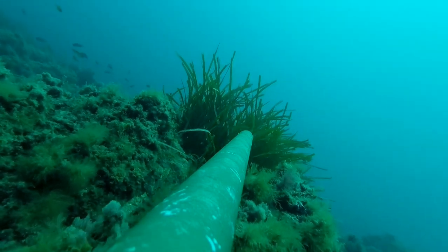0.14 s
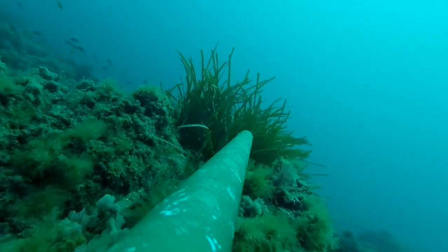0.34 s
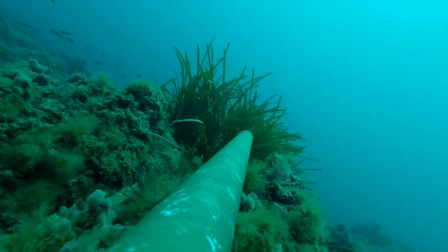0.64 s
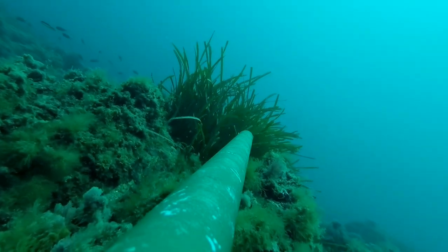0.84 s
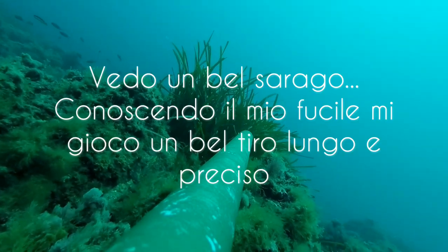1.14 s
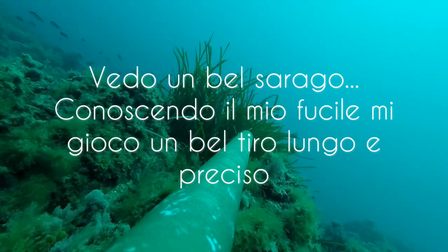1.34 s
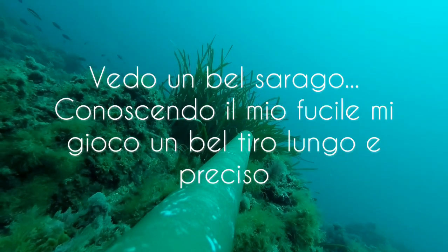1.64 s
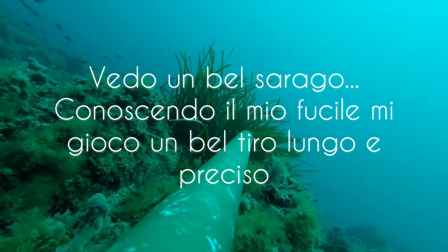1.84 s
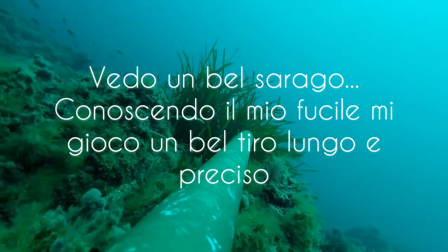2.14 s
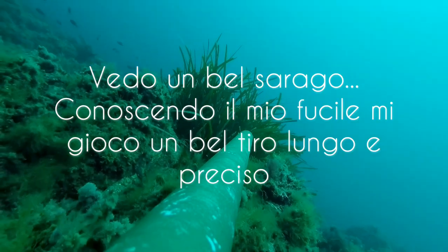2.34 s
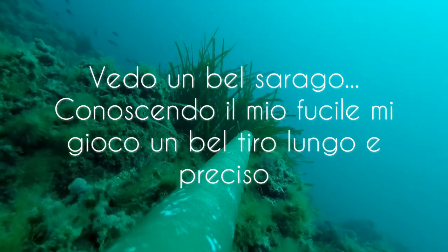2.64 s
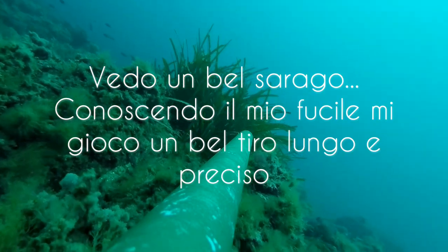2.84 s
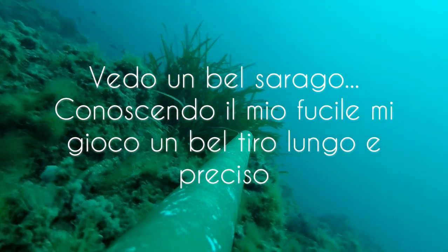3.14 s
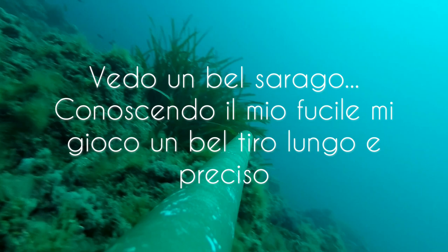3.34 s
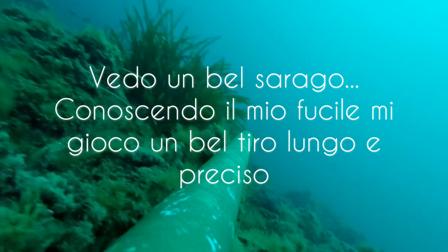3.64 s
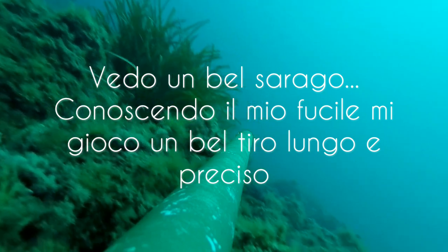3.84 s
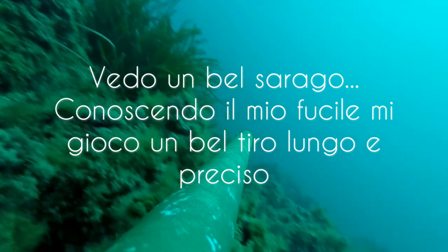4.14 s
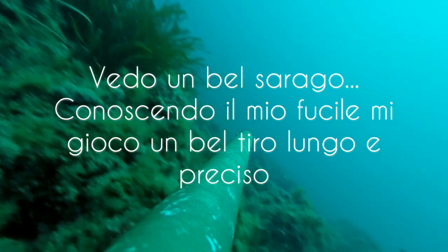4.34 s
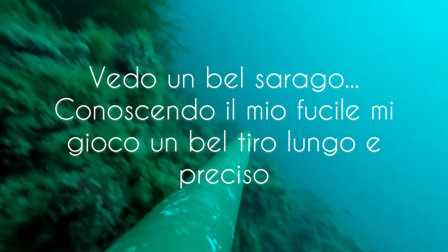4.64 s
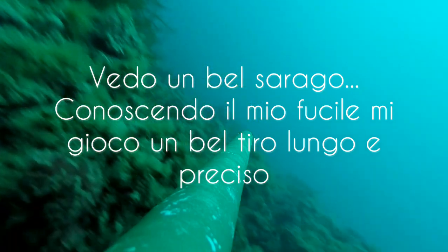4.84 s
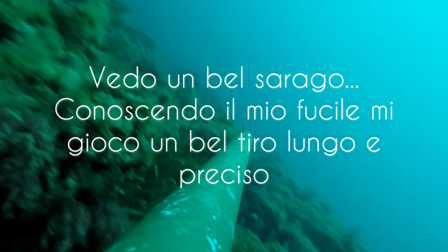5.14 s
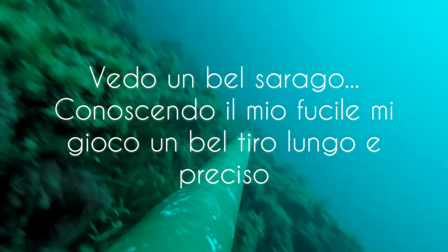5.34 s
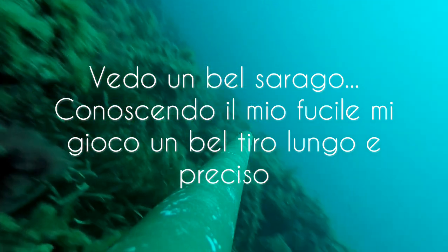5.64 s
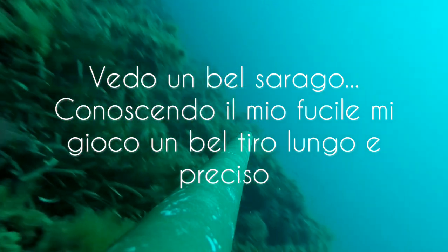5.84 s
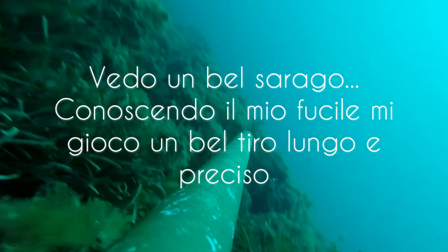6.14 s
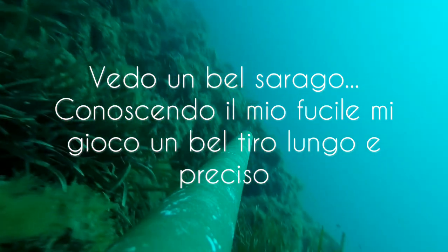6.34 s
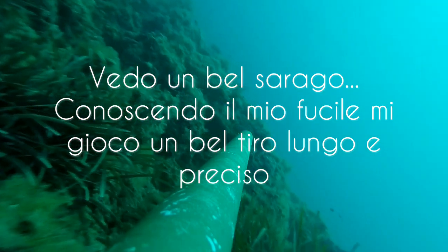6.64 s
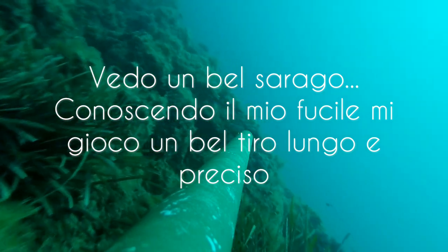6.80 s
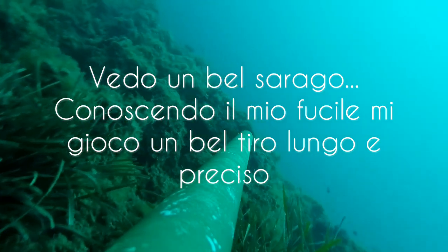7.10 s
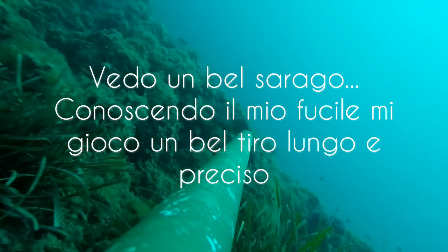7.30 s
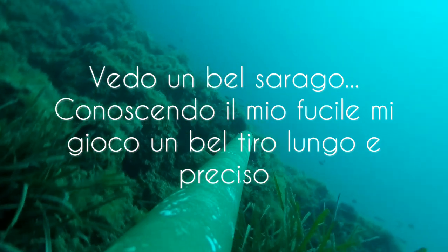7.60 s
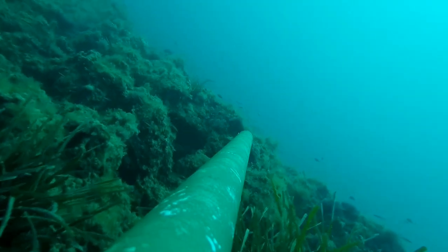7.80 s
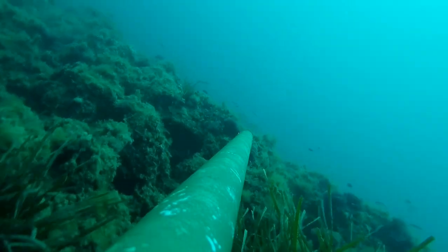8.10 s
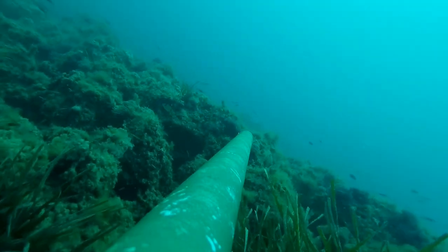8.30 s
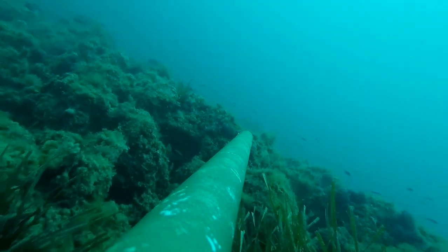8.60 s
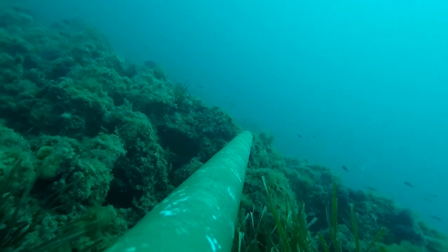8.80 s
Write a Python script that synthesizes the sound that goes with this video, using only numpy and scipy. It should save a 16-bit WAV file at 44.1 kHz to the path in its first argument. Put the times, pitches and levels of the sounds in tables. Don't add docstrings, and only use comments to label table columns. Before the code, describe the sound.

Heard from one microphone sealed inside an underwater camera housing over a rocky seabed: dense, dry shrimp crackle, sharp snaps in front of finer ticks and hiss. A very low wavering hum starts fairly soft, strengthens from about three seconds and surges and stalls. A glove rubs softly, weed drags lightly past, and a few dull handle knocks land midway.

```python
import sys
import numpy as np
from scipy import signal
from scipy.fft import rfft, irfft, next_fast_len
from scipy.io import wavfile
from scipy.ndimage import uniform_filter1d

SR = 44100
rng = np.random.default_rng(int(sys.argv[2]) if len(sys.argv) > 2 else 0)


def invert_db(x):
    u = np.asarray(x, float) / 20
    return 10 ** u


def pcm_store(signal):
    levels = np.round(np.clip(np.atleast_2d(signal), -1, 1) * 32767)
    wavfile.write(sys.argv[1], SR, levels.astype(np.int16).T)


N = 395129

# (time [s], peak [dB], centre [Hz], top above 7 kHz [dB re peak], body under 3 kHz [dB re peak])
NEAREST_SNAPS = [(0.2274, -41.5, 3130, -26, 8.5), (0.6068, -31.5, 5330, -30, -18),
                 (0.6586, -28, 4340, -10, -21), (0.95, -29, 5270, 3, -11), (1.6822, -31.5, 3460, -7, -13),
                 (2.078, -27.5, 3100, -13, -23), (2.369, -26, 5940, -15, -28),
                 (2.3806, -29.5, 4150, -10, -1.5), (2.6016, -27.5, 4400, -16, -4.5),
                 (3.263, -21, 4400, -20, -29), (3.918, -30, 3050, -7, -17), (4.1398, -27, 6900, -18, -25),
                 (4.149, -28, 2960, -20, -6), (4.7093, -31, 3670, -22, -1), (5.4266, -30.5, 3780, -15, -11),
                 (5.5276, -30.5, 3840, -8, -4), (6.11, -22, 5370, -14, -14.5),
                 (6.4334, -46.5, 3050, -21.5, 13.5), (6.6635, -28.5, 4300, -12, -11),
                 (6.8286, -18.5, 4370, -17, -3), (7.8519, -27.5, 4990, -25, -24),
                 (7.8588, -29.5, 3900, -8, -9), (8.4862, -25.5, 3760, -19, -10),
                 (8.5081, -31, 3050, -12, -14)]
# (time [s], peak [dB], centre [Hz])
SNAPS_IN_VIEW = [(0.3773, -38.5, 3500), (0.841, -31.5, 4570), (1.2347, -35, 4570), (1.881, -36, 4760),
                 (2.3604, -36, 4450), (3.3056, -38, 5410), (3.3198, -33.5, 4200), (3.8834, -36.5, 6100),
                 (3.8907, -37.5, 4030), (4.6188, -36.5, 5580), (4.7735, -32.5, 6500), (5.3775, -28.5, 5150),
                 (5.4366, -34, 5620), (5.4465, -33.5, 4800), (5.7917, -37.5, 5070), (6.121, -34, 4750),
                 (6.1425, -35, 5350), (6.3138, -34, 3880), (6.8396, -37.5, 3000), (7.1972, -39, 5640),
                 (7.2888, -33.5, 4600), (7.368, -33, 3330), (7.398, -34.5, 4170), (7.5536, -34, 5440),
                 (7.6696, -34, 4270), (7.738, -35, 4440), (7.9108, -34.5, 6100), (8.371, -39, 5170),
                 (8.6507, -35, 3880), (8.823, -38.5, 5050)]
# (time [s], peak [dB], centre [Hz])
SNAPS_IN_ROCK = [(0.2431, -36.5, 3670), (1.119, -40.5, 3220), (2.0598, -41, 3990), (2.2486, -33.5, 4000),
                 (2.3908, -34, 5300), (2.5325, -39, 3440), (2.8018, -38.5, 3750), (3.1593, -38.5, 3210),
                 (3.846, -37, 3900), (4.262, -40, 3770), (4.2973, -39, 3330), (4.7016, -39, 3460),
                 (5.1589, -34, 3800), (5.2775, -37, 2950), (5.651, -34.5, 4150), (5.7982, -33, 3740),
                 (5.811, -35, 3220), (5.9702, -38, 3950), (6.333, -35.5, 3820), (6.465, -36, 5100),
                 (6.677, -38, 4390), (7.042, -41, 4230), (7.1785, -39, 3830), (7.4633, -32.5, 3400),
                 (7.69, -38.5, 3430), (8.0525, -35.5, 2810), (8.2332, -38, 3020), (8.5875, -39, 3960),
                 (8.686, -37, 5730), (8.8409, -32, 2940)]
# (time [s], peak [dB], centre [Hz])
SNAPS_IN_WEED = [(0.3322, -36, 5200), (0.5917, -34.5, 6100), (0.734, -33.5, 5820), (0.7844, -37, 4400),
                 (0.9288, -35, 4800), (1.397, -34, 3300), (1.435, -32.5, 4270), (1.6734, -33, 5500),
                 (2.134, -34, 5170), (2.1676, -33, 5600), (2.242, -36, 5460), (3.1103, -36, 4400),
                 (3.1684, -30, 5390), (3.254, -35, 4670), (3.2912, -30, 5200), (3.6406, -31, 5900),
                 (3.9524, -32.5, 5900), (4.0678, -34, 5600), (4.0883, -35.5, 3800), (4.1778, -33.5, 6140),
                 (4.4802, -31, 5660), (4.5844, -37, 4240), (5.1767, -40, 6600), (6.2211, -32.5, 4250),
                 (6.8591, -35, 5340), (7.143, -33.5, 5600), (7.5314, -36, 4600), (7.6472, -32, 5670),
                 (7.7547, -31.5, 3360), (8.4776, -29, 3980)]
# (time [s], peak [dB], centre [Hz])
FAR_ROCK_SNAPS = [(0.068, -37.5, 3610), (0.1502, -37, 4000), (0.4858, -37, 4000), (0.671, -36, 4150),
                  (0.917, -37, 4530), (1.4522, -39.0, 3730), (1.5367, -40, 4320), (1.6963, -38, 4670),
                  (1.7588, -37.5, 3620), (1.9493, -39, 4690), (1.9656, -42, 4210), (2.02, -39.5, 3530),
                  (2.0472, -41, 4680), (2.2559, -42, 4290), (2.3384, -44, 4440), (2.348, -39, 3590),
                  (2.5756, -34.5, 4000), (2.594, -37, 3860), (3.173, -37.5, 4340), (3.2296, -36.5, 3620),
                  (3.279, -35, 4450), (3.301, -37, 3740), (3.333, -42, 4350), (3.3596, -37, 4370),
                  (4.055, -43, 4260), (4.4054, -35, 3970), (4.6516, -37, 4670), (4.7501, -42, 4080),
                  (4.874, -38.0, 4090), (4.951, -41, 3140), (4.9802, -47, 4180), (5.1637, -38, 2630),
                  (5.2582, -40, 4360), (5.365, -40, 3690), (5.3691, -37, 4710), (5.7015, -37.5, 4220),
                  (5.7215, -38, 3880), (5.7959, -49, 4140), (5.8367, -38, 3410), (5.9515, -47, 4420),
                  (6.448, -40, 2920), (6.7178, -39, 3100), (6.751, -38, 3560), (6.7731, -42, 4350),
                  (6.8396, -41, 4300), (6.891, -37, 3930), (6.897, -37.5, 3430), (7.0781, -44, 3840),
                  (7.2737, -35, 4010), (7.3386, -37, 4500), (7.578, -38.0, 4720), (7.665, -39, 4690),
                  (7.9208, -44, 4670), (8.3938, -36, 4450), (8.4054, -35.5, 4180), (8.5067, -37.0, 3220),
                  (8.513, -35, 3920), (8.6575, -40, 4110), (8.6646, -33.5, 4460), (8.9076, -37, 3610)]
# (time [s], peak [dB], centre [Hz])
FAR_WEED_SNAPS = [(0.1081, -37, 5840), (0.7766, -41, 5800), (0.9873, -36, 4860), (1.0745, -38.5, 4910),
                  (1.2291, -36, 5190), (1.269, -42, 5720), (1.3521, -39.5, 6620), (1.4854, -35.5, 5130),
                  (2.1491, -44, 5610), (2.1747, -42, 5040), (2.1781, -38, 5810), (2.4541, -41, 5200),
                  (2.4777, -44, 5410), (2.6624, -35, 5400), (3.0396, -37.5, 5490), (3.261, -34, 6260),
                  (3.41, -32.5, 5400), (3.5198, -44, 6060), (3.531, -39.5, 7160), (3.6205, -41, 5730),
                  (3.6477, -37.0, 5400), (3.6756, -35, 5220), (3.8287, -39, 5370), (3.9111, -37, 5960),
                  (4.0303, -38, 5330), (4.4548, -37, 5860), (4.4723, -46, 5270), (4.6674, -45, 6700),
                  (4.736, -36, 5660), (4.7584, -41, 5460), (4.7961, -37, 6020), (4.9861, -38, 5900),
                  (5.039, -46, 5740), (5.1295, -42, 5640), (5.1437, -39, 5550), (5.1822, -38.5, 5600),
                  (5.2979, -41, 5930), (5.3026, -42, 5830), (5.3203, -40, 5220), (5.3455, -47, 4790),
                  (5.7327, -40, 5580), (6.0029, -45.5, 5490), (6.0648, -41, 6000), (6.0754, -41, 6670),
                  (6.0863, -36, 5200), (6.1043, -38, 5460), (6.2713, -40, 4990), (6.9509, -38.0, 6010),
                  (6.9682, -34.5, 6820), (6.9913, -38.0, 5900), (7.1975, -38, 6330), (7.5057, -39, 4820),
                  (7.558, -49, 6490), (7.6789, -35, 6130), (7.8409, -33, 5160), (7.8903, -34, 6760),
                  (8.1063, -37, 4980), (8.369, -39, 5300), (8.7154, -37, 5750), (8.745, -40, 4890)]
# (time [s], level [dB], half length [s])
WATER_PUSHES = [(0.1, -43, 0.036), (0.36, -40, 0.083), (0.579, -44, 0.019), (0.718, -41, 0.021),
                (1.4, -47, 0.025), (1.961, -37, 0.014), (2.09, -36, 0.093), (2.443, -40, 0.023),
                (2.76, -33, 0.1), (3.1, -31, 0.12), (3.244, -41, 0.044), (3.44, -31.5, 0.11),
                (3.811, -31, 0.019), (4.229, -38, 0.051), (4.428, -27, 0.03), (4.538, -34, 0.026),
                (4.677, -34, 0.1), (4.81, -39, 0.056), (4.94, -37, 0.06), (5.139, -37, 0.028),
                (5.395, -29, 0.029), (5.666, -29.5, 0.045), (6.82, -26, 0.035), (6.916, -25, 0.034),
                (7.008, -29.5, 0.026), (7.36, -27, 0.065), (7.785, -35.5, 0.26), (8.44, -32, 0.041),
                (8.544, -33, 0.026), (8.88, -36, 0.03)]
# (time [s], depth [dB])
ROCKING_STALLS = [(0.272, -20), (0.467, -36), (0.68, 0), (0.821, -20), (0.927, -27), (1.161, -10),
                  (1.311, -2), (1.367, 2), (1.508, -33), (1.785, -5), (1.875, -8), (2.249, -16), (2.408, 3),
                  (2.519, -23), (2.637, -17), (2.714, -4), (2.844, -18), (3.188, -2), (3.324, -9),
                  (3.488, -8), (3.72, -3), (3.939, -6), (3.984, 6), (4.299, -6), (4.382, -12), (4.481, -3),
                  (4.628, -9), (4.757, -7), (4.991, -8), (5.075, -8), (5.265, -11), (5.442, -3), (5.59, -6),
                  (5.746, -1), (5.819, -14), (5.884, -6), (6.186, -15), (6.415, -8), (6.508, -7),
                  (6.649, -6), (6.753, -6), (6.871, -3), (6.955, -8), (7.041, -12), (7.12, -19),
                  (7.272, -1), (7.333, -13), (7.404, -16), (7.465, -7), (7.678, -17), (7.85, -3),
                  (7.984, -8), (8.057, -6), (8.132, -14), (8.24, -11), (8.304, -20), (8.506, -10),
                  (8.583, -15), (8.646, -18), (8.796, -6)]
# (time [s], current over the calm start [dB], nearness of the colony [dB])
WATER_FLOW = [
    (0.0, 5, -57),
    (1.8, -3, -57.5),
    (2.75, 7.5, -58),
    (3.4, 8, -57),
    (3.7, 6, -57),
    (4.9, 7, -57.5),
    (5.5, 6.5, -56),
    (6.0, 5, -57),
    (7.0, 4, -56.5),
    (8.96, -1.5, -56),
]
# (frequency [Hz], level [dB])
SURGE_COLOUR = [(15, 0.5), (27, 6), (50, 0), (72, -7.5), (100, -12.5), (160, -22), (300, -27.5),
                (600, -52.5)]
# (frequency [Hz], level [dB])
RUSTLE_COLOUR = [(100, 7.5), (250, 0.5), (600, -1), (1200, 0), (2000, -5), (3500, -15), (6000, -25.5)]
# (time [s], level [dB], half length [s])
GLOVE_PRESSES = [(2.672, -60, 0.01), (2.725, -57, 0.015), (2.81, -53, 0.028), (2.85, -57, 0.013),
                 (2.882, -57, 0.0086), (2.917, -45, 0.018), (2.99, -54, 0.043), (3.075, -65, 0.013),
                 (3.115, -50, 0.0082), (3.152, -56, 0.012), (3.195, -48, 0.022), (3.41, -54, 0.014),
                 (3.446, -49.5, 0.022), (3.495, -72, 0.015)]
# (frequency [Hz], level [dB])
GLOVE_COLOUR = [(150, -37), (300, 16.5), (700, 10.5), (1100, 0), (1600, 4), (2000, -12), (4000, -53)]
# (time [s], peak [dB], upper
# edge [Hz], time to fall 60 dB [s])
HANDLE_KNOCKS = [(2.535, -51, 250, 0.12), (5.099, -28, 330, 0.084), (5.145, -35, 400, 0.12),
                 (5.203, -45, 330, 0.052), (5.71, -40, 140, 0.1), (5.803, -35, 260, 0.08),
                 (6.788, -41.5, 330, 0.1), (6.828, -34, 1300, 0.02), (7.327, -48, 405, 0.011),
                 (1.8, -52, 250, 0.087), (0.6, -52, 290, 0.14), (4.633, -45, 380, 0.044),
                 (4.745, -46, 300, 0.054), (5.114, -36, 240, 0.06), (4.57, -49.5, 350, .05),
                 (1.045, -54, 130, .08)]
# (time [s], peak [dB], pitch [Hz], time to fall 60 dB [s])
SHELL_TAPS = [(0.116, -52, 685, 0.035), (2.402, -50, 683, 0.037), (2.666, -48.5, 696, 0.035),
              (3.187, -47, 670, 0.058), (3.2, -51, 660, 0.04), (4.534, -56, 680, 0.04),
              (8.21, -54, 660, 0.037), (2.93, -51, 420, 0.05), (5.58, -55, 500, 0.018),
              (5.511, -49.5, 546, 0.026), (5.711, -40.5, 540, 0.012), (5.897, -51, 650, 0.04),
              (5.794, -53, 660, 0.033), (4.633, -52, 660, 0.03), (3.073, -51, 710, 0.04),
              (3.44, -50, 960, 0.04)]
# (time [s], level [dB])
WEED_BRUSH = [
    (3.65, -67),
    (3.85, -56),
    (4.3, -57.5),
    (4.6, -55),
    (5.0, -56.5),
    (5.45, -57),
    (5.62, -63),
    (5.9, -67),
]
# (frequency [Hz], level [dB])
WEED_COLOUR = [(300, -13), (600, 3.5), (1000, -7.5), (1600, 3), (2300, -4.5), (3200, -7), (5000, -33)]
# (frequency [Hz], level [dB])
COLONY_COLOUR = [(500, -22), (1200, -9), (2200, 0.5), (4500, 5), (7000, 2.5), (9000, -5.5), (11000, -16.5),
                 (15000, -20.5), (17000, -50)]
# (frequency [Hz], rms level [dB])
WHINE_LINES = [(8500, -86), (8525, -81), (8550, -83), (8575, -88), (8625, -81), (8650, -86), (8675, -89)]
# (frequency [Hz], width [Hz], boost [dB])
HOUSING_MODES = [(241, 41, -6), (426, 14, -9), (667, 67, -1.5), (957, 81, 4), (1253, 82, 6), (1517, 48, -2),
                 (2497, 470, 3.5), (3050, 190, 2.5), (4230, 390, 3), (5730, 570, -3), (7950, 98, -35),
                 (14500, 9800, 6)]
# (low [Hz], high [Hz], side against middle [dB], rarity [spreads], pull of a snap [1])
STEREO_PARTING = [(60, 1200, -17, 2.0, 0), (1200, 4600, -13, 2.0, 0), (4600, 7500, -9, 1.7, 2.5),
                  (7500, 10200, -6, 1.0, 2.5), (10200, 12500, -6, .2, 1.5), (12500, 15200, -6, .2, 1.5)]
# (start [s], end [s])
DROPOUT = (8.4915, 8.5045)


def in_time(rows):
    s, *columns = np.transpose(rows)
    return [np.interp(np.arange(N) / SR, s, column) for column in columns]


def rms_one(x):
    return x / np.sqrt(np.mean(x ** 2) + 1e-20)


def colour(x, spectrum):
    hz, db = np.transpose(spectrum)
    size = next_fast_len(N)
    log_hz = np.log(np.arange(size // 2 + 1) * SR / size + 1)
    gain = invert_db(np.interp(log_hz, np.log(hz), db))
    return irfft(rfft(x, size) * gain, size)[:N]


def drift(rate):
    step = 40
    r = np.exp(-2 * step * np.pi * rate / SR)
    noise = rng.standard_normal(N // step + 2002)
    slow = signal.lfilter([1], [1, -2 * r, r * r], noise)[2000:]
    return np.interp(np.arange(N) / step, np.arange(len(slow)), rms_one(slow))


def resonance(x, hz, width_hz):
    r = np.exp(-np.pi * width_hz / SR)
    poles = [1, -2 * r * np.cos(2 * np.pi * hz / SR), r * r]
    return signal.lfilter([(1 - r * r) / 2, 0, (r * r - 1) / 2], poles, x)


def housing(x, direct=0.78):
    ringing = sum(invert_db(db) * resonance(x, hz, width_hz) for hz, width_hz, db in HOUSING_MODES)
    return direct * x + ringing


def bandpass(x, order, low_hz, high_hz):
    return signal.sosfilt(signal.butter(order, [low_hz, high_hz], "band", fs=SR, output="sos"), x)


def add(out, s, burst):
    i = round(s * SR)
    out[i:i + len(burst)] += burst[:N - i]


def grains(per_s, spread_db, cap=4):
    sizes = invert_db(spread_db * np.minimum(rng.exponential(1, N), cap))
    signs = rng.choice([-1, 1], N)
    return sizes * signs * (rng.random(N) < per_s / SR)


def swells(rows):
    out = np.zeros(N)
    for s, db, half_s in rows:
        t = np.arange(-3 * half_s, 3 * half_s, 1 / SR)
        t = t[t + s > 0]
        add(out, s + t[0], invert_db(db) * np.exp(-(t / half_s) ** 2))
    return out


def near_snaps(crack_s=0.00041, tail_s=0.0039, tail_db=-14, breadth=0.98, jet_s=0.0041, jet_db=-17):
    # sharp top dB, dull body dB
    groups = [(SNAPS_IN_VIEW, (-5.5, -9)), (SNAPS_IN_ROCK, (-24, -4)), (SNAPS_IN_WEED, (-17.5, -18)),
              (FAR_ROCK_SNAPS, (-15, -13)), (FAR_WEED_SNAPS, (-12, -34))]
    snaps = list(NEAREST_SNAPS)
    for rows, tone_db in groups:
        for row in rows:
            snaps.append((*row, *(tone_db + rng.normal(0, 3, 2))))

    out, lead = np.zeros(N), 140
    t = (np.arange(740) - lead) / SR
    jet = invert_db(jet_db) * np.exp(-np.abs(t) / jet_s)
    crack_and_tail = np.exp(-np.abs(t) / crack_s) + invert_db(tail_db) * np.exp(-np.abs(t) / tail_s)
    shape = np.where(t < 0, jet, crack_and_tail)
    bursts = 0.59 * rng.standard_normal((len(snaps), len(t))) * shape
    bursts[:, lead] -= 3

    rings = signal.sosfilt(signal.butter(6, 6900, fs=SR, output="sos"), housing(bursts, direct=0.48))
    edges = bandpass(bursts, 2, 7000, 14500)
    thumps = bandpass(bursts + 0.14 * rings, 2, 1750, 3200)
    booms = -bandpass(bursts + 0.5 * rings, 2, 700, 1750)
    for snap, ring, edge, thump, boom in zip(snaps, rings, edges, thumps, booms):
        s, db, hz, top_db, low_db = snap
        body = resonance(resonance(ring, hz, breadth * hz), hz, breadth * hz)
        parts = [(body, 0), (edge, top_db), (thump, low_db + 0.11), (boom, low_db - 10)]
        mixed = sum(invert_db(part_db) * part / np.abs(part).max() for part, part_db in parts)
        add(out, s - lead / SR, invert_db(db) * mixed)
    return out


def rocking(current_db):
    t = np.arange(N) / SR
    rest_db = -49 + 0.49 * current_db + 1.4 * t
    coarse_t, stall_s = t[::64], 0.02
    stall_db = sum(db * np.exp(-((coarse_t - s) / stall_s) ** 2) for s, db in ROCKING_STALLS)
    moving_db = 10 * np.log10(invert_db(rest_db) ** 2 + swells(WATER_PUSHES) ** 2)
    return moving_db + np.interp(t, coarse_t, stall_db)


def sway(sway_db, centre_hz=37, wobble=0.0914):
    level = invert_db(sway_db + 1.68 * drift(29.4))
    hz = centre_hz * (1 + wobble * drift(7.2))
    return level * np.sqrt(2) * np.sin(2 * np.pi * np.cumsum(hz) / SR)


def flow(sway_db, surge_db, rustle_db, follow=0.17):
    lumps_db = follow * (sway_db - uniform_filter1d(sway_db, size=SR)) + 1.6 * drift(19)
    surge = invert_db(lumps_db) * colour(rng.standard_normal(N), SURGE_COLOUR)
    wash = invert_db(1.07 * drift(26)) * rng.standard_normal(N)
    rustle = wash + 0.35 * rms_one(grains(300, spread_db=5, cap=1.13))
    rustle = rms_one(colour(housing(rustle), RUSTLE_COLOUR))
    return invert_db(surge_db + 10) * rms_one(surge) + invert_db(rustle_db + 1) * rustle


def rub(start_s=2.68, end_s=3.49, slide_db=-57.5, attack_db_per_s=184, release_db_per_s=263):
    t = np.arange(N) / SR
    fade_db = np.maximum(attack_db_per_s * (start_s - t), release_db_per_s * (t - end_s))
    presses = swells(GLOVE_PRESSES)
    level = invert_db(slide_db - np.maximum(fade_db, 0)) + presses
    wall = housing(grains(450, spread_db=2, cap=2.4) * invert_db(2.2 * drift(29)))
    sound = level * rms_one(colour(wall + 0.86 * housing(wall), GLOVE_COLOUR))
    pressed = presses / level * (1 + 2.4 * np.clip(t - start_s, 0, 1))
    return sound + invert_db(-17) * pressed * resonance(sound, 1200, 800)


def knocks(contact=0.38):
    out, t = np.zeros(N), np.arange(SR // 8) / SR
    noises = rng.standard_normal((len(HANDLE_KNOCKS), len(t)))
    for (s, db, hz, t60), noise in zip(HANDLE_KNOCKS, noises):
        blow = contact * np.sqrt(t60 * SR) * (t == 0)
        puff = bandpass(blow + noise * invert_db(-60 * t / max(t60, 0.01)), 6, 0.237 * hz, hz)
        puff = puff + 0.5 * resonance(puff, 0.66 * hz, 0.28 * hz)
        add(out, s, invert_db(db) * puff / np.abs(puff).max())
    return out


def taps(rise_s=0.0007):
    out, t = np.zeros(N), np.arange(SR // 8) / SR
    for s, db, hz, t60 in SHELL_TAPS:
        level = invert_db(db + 9 - 60 * t / max(t60, 0.01)) * (1 - np.exp(-t / rise_s))
        add(out, s, level * np.sin(2 * np.pi * hz * t))
    return out


def brush():
    before, after = (WEED_BRUSH[0][0] - 0.1, -100), (WEED_BRUSH[-1][0] + 0.11, -100)
    db, = in_time([before, *WEED_BRUSH, after])
    flutter_db = 1.6 * drift(47) + 0.7 * drift(8.1)
    scrapes = housing(grains(1800, spread_db=4.5, cap=2.4), direct=2.9)
    return invert_db(db + flutter_db) * rms_one(colour(scrapes, WEED_COLOUR))


def colony(colony_db, per_s=260, spread_db=3, blur_db=-2.5, swell_db=2, top_swell_db=5):
    ticks = grains(per_s * invert_db(4 * drift(12)), spread_db, cap=1.23)
    scatter = rng.standard_normal(130) * np.exp(-np.arange(130) / 30) * 2.24
    ticks = ticks + signal.fftconvolve(ticks, scatter)[:N]

    pitches = np.geomspace(1800, 14000, 9)
    choice = rng.integers(0, len(pitches), N // 64 + 1).repeat(64)[:N]
    coloured = np.zeros(N)
    for k, hz in enumerate(pitches):
        chosen = ticks * (choice == k) + 1e-18
        coloured += resonance(resonance(chosen, hz, hz), hz, hz) / hz ** 0.38

    hiss = rng.standard_normal(N)
    blur = hiss.copy()
    for hz in (8000, 10500, 13500):
        blur += (invert_db(top_swell_db * drift(25)) - 1) * resonance(hiss, hz, 0.15 * hz)
    blur = invert_db(blur_db + swell_db * drift(20.5)) * blur
    crackle = housing(0.6 * rms_one(coloured) + blur)
    return invert_db(colony_db) * rms_one(colour(crackle, COLONY_COLOUR))


def whine():
    t = np.arange(N) / SR
    return sum(invert_db(db) * np.sqrt(2) * np.sin(2 * np.pi * (hz * t + rng.random())) for hz, db in WHINE_LINES)


def scene():
    current_db, colony_db = in_time(WATER_FLOW)
    sway_db = rocking(current_db)
    surge_db = -61 + 1.21 * current_db
    rustle_db = -61 + 0.032 * current_db + 0.6472 * np.arange(N) / SR
    water = sway(sway_db) + flow(sway_db, surge_db, rustle_db)
    handling = rub() + brush() + knocks() + taps()
    steady = water + handling + colony(colony_db + 0.5) + whine()
    steady = signal.sosfilt(signal.ellip(10, 1, 60, 15350, fs=SR, output="sos"), steady)
    snaps = signal.sosfilt(signal.cheby2(12, 60, 16800, fs=SR, output="sos"), near_snaps())
    return np.stack([steady + snaps, steady + snaps])


def low_pass(x):
    return signal.sosfilt(signal.butter(12, 16510, fs=SR, output="sos"), x)


def record(dry):
    t = np.arange(N) / SR
    start_s, end_s = DROPOUT
    outside_s = np.maximum(start_s - t, (t - end_s) / 4)
    mono = dry[0] * np.clip(outside_s / 0.0016, 0.012, 1)
    side, shared = np.zeros(N), drift(4.45)
    for low_hz, high_hz, db, rarity, on_snaps in STEREO_PARTING:
        power = uniform_filter1d(bandpass(mono, 6, low_hz, high_hz) ** 2, size=128)
        level = np.sqrt(np.abs(power))
        loudness = np.log(uniform_filter1d(level ** 2, size=1024) + 1e-14)
        surprise = loudness - uniform_filter1d(loudness, size=22050)
        patch = shared + 0.6 * drift(12) + on_snaps * surprise > rarity
        opening = uniform_filter1d(1.0 * patch, size=300)
        noise = rms_one(bandpass(rng.standard_normal(N), 6, low_hz, high_hz))
        side += invert_db(db) * noise * level * opening
    return low_pass(np.stack([mono + side, mono - side]))


dry = scene()
out = record(dry)
pcm_store(out)
```